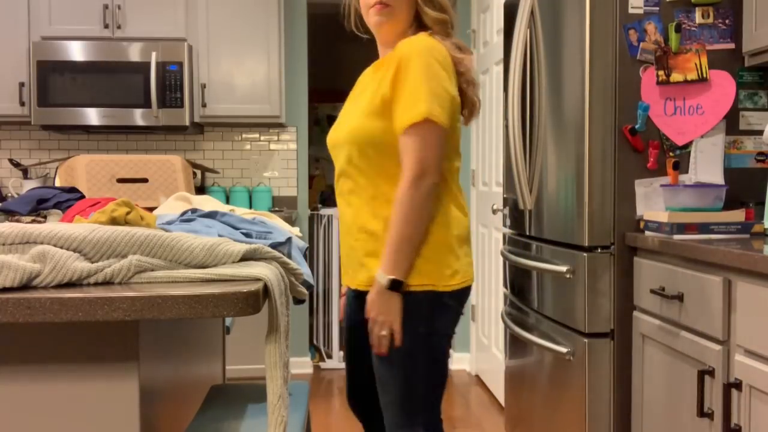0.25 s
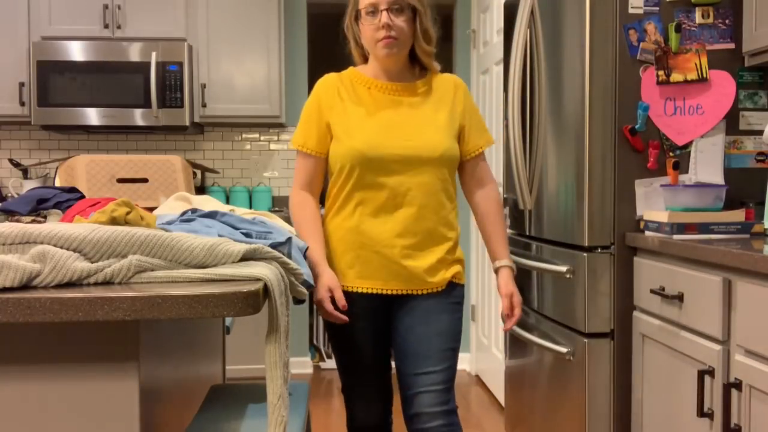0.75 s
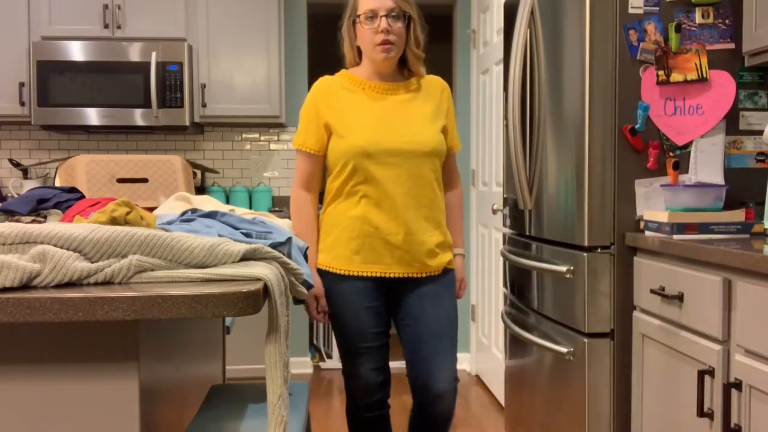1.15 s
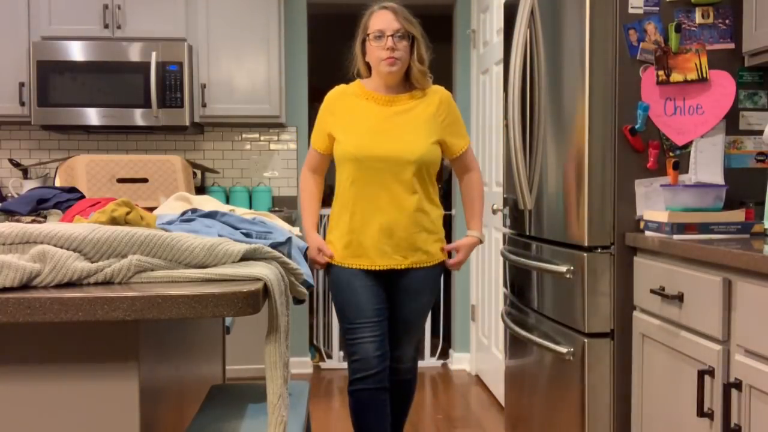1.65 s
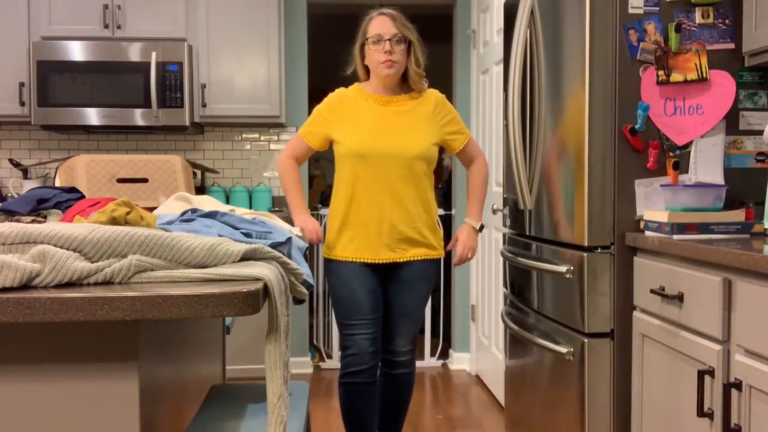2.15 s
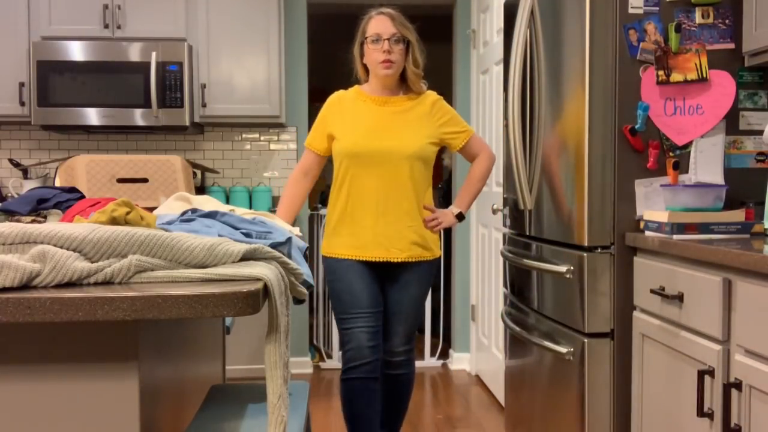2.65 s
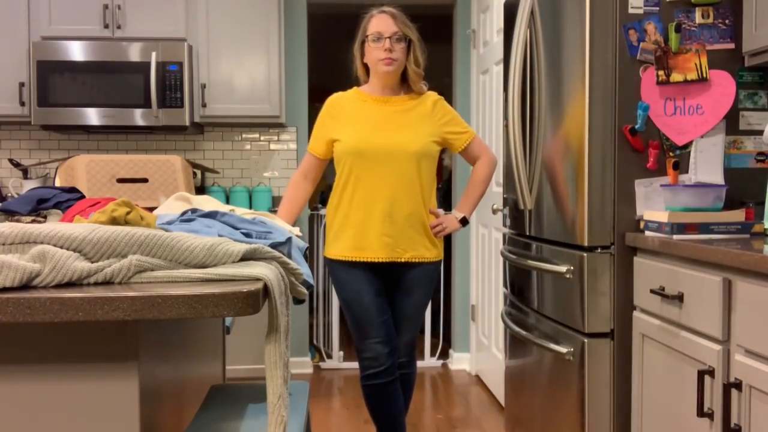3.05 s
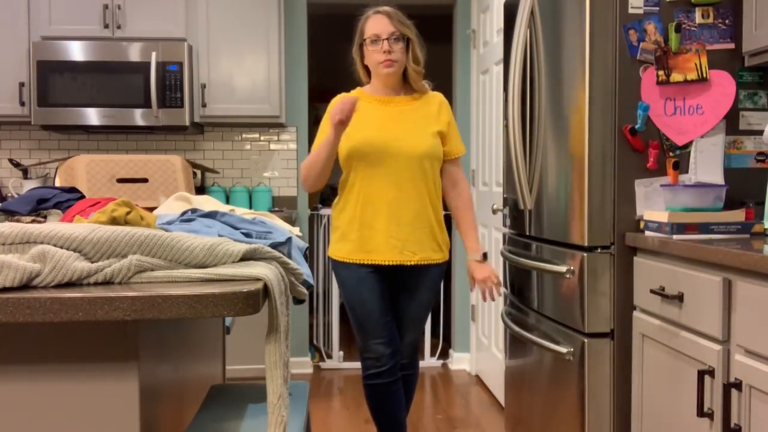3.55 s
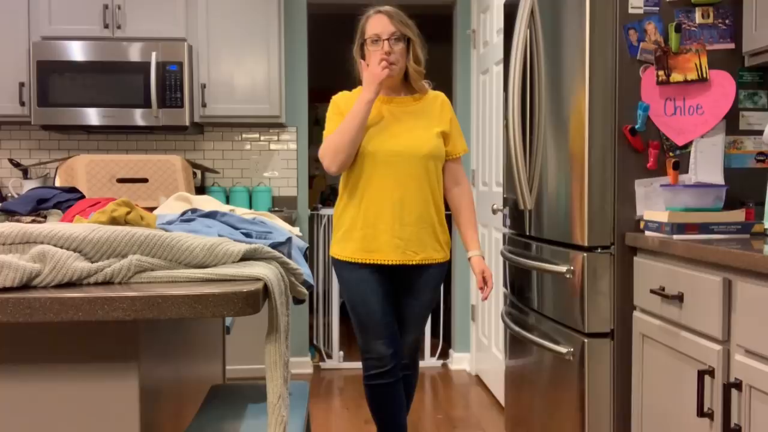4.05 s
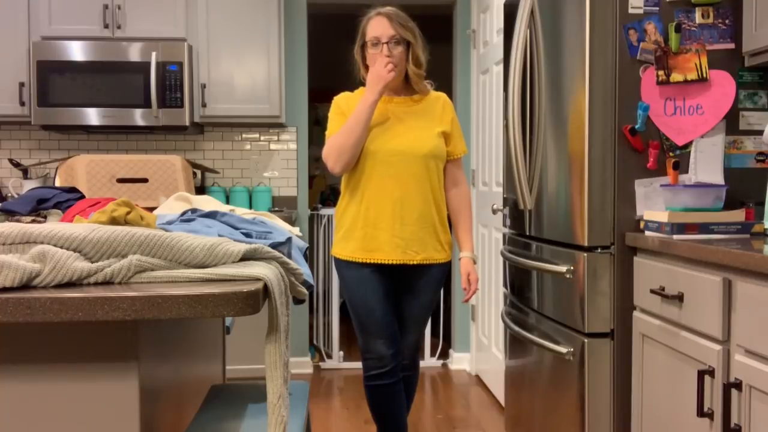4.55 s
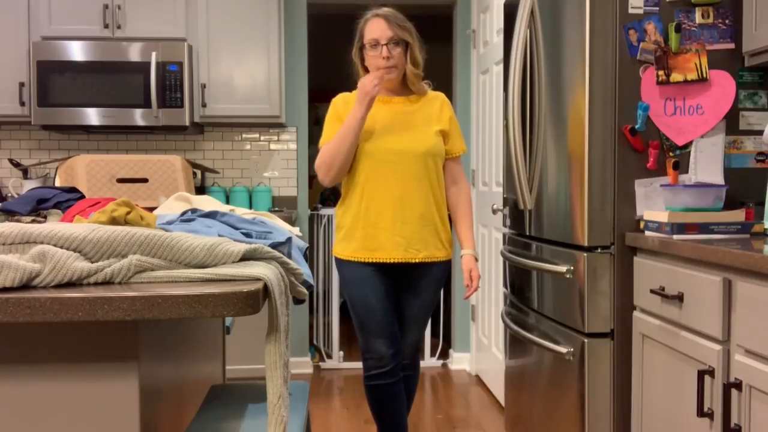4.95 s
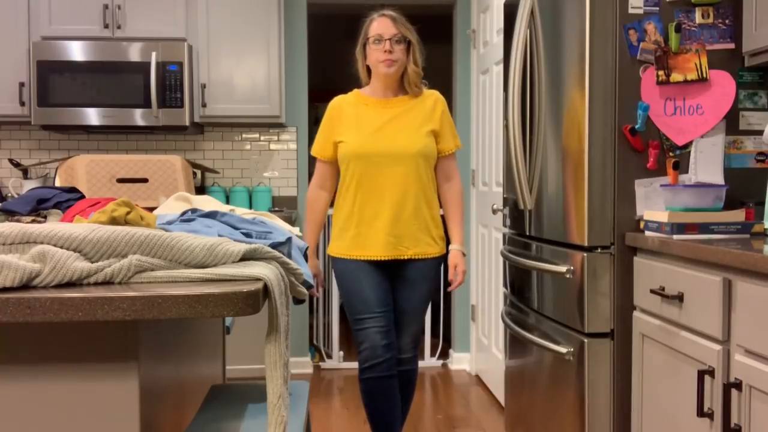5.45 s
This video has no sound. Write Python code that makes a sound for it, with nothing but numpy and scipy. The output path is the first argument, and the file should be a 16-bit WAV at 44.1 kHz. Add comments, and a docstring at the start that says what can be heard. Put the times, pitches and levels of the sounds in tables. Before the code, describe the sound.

A faint, low appliance hum fills a small kitchen with hard surfaces. Slightly to the left, gentle heel knocks and dull sole thuds land irregularly on wooden boards, each with a brief room echo, along with swishing clothes and a single quick creak. Then the person stands still, and only light ticks and a closing rustle of cloth are heard over the hum.

```python
"""An appliance hums low in a small, hard kitchen. For three seconds someone steps softly across hardwood:
heel and sole knock the boards, the room answers each contact, and jeans and sleeves swish and catch.
About a second in, one board sticks and slips in a creak. Then the walker stops and the floor calms.
Hands and clothes give a few faint ticks, and a last shift of weight rustles the cloth."""
import sys
import numpy as np
from scipy import signal
from scipy.fft import rfft, irfft, next_fast_len
from scipy.io import wavfile
from scipy.ndimage import uniform_filter1d, map_coordinates

SR = 44100
rng = np.random.default_rng(int(sys.argv[2]) if len(sys.argv) > 2 else 0)


def store_wav(level_fs):
    """Save 16-bit WAV to argv[1]."""
    pcm = np.round(np.clip(np.atleast_2d(level_fs), -1, 1) * 32767)
    wavfile.write(sys.argv[1], SR, pcm.T.astype(np.int16))


N = 250750


def amp(db):
    """Decibels to gain."""
    return 10 ** (np.asarray(db) / 20)


def unit(x):
    """Scale to rms 1."""
    return x / np.sqrt(np.mean(x ** 2) + 1e-20)


def along(points, hz):
    """Read a curve of (f/Hz, value) points on a log frequency axis."""
    f, v = np.transpose(points)
    return np.interp(np.log(hz + 1), np.log(f + 1), v)


def curves(rows):
    """One automation curve for each column after the time."""
    s, *cols = np.transpose(rows)
    return [np.interp(np.arange(N) / SR, s, c) for c in cols]


def wobble(rate):
    """A smooth random curve, rate knots a second."""
    return map_coordinates(rng.standard_normal(int(N * rate / SR) + 4), [np.arange(N) * rate / SR])


def ripple(hz, width_hz):
    """A smooth random EQ curve: near surfaces colour each sound in their own way."""
    return map_coordinates(rng.standard_normal(int(SR / width_hz) + 4), [hz / width_hz])


def filtered(x, response):
    """Pass x through a frequency response."""
    n = x.shape[-1]
    m = next_fast_len(n + SR // 4)
    return irfft(rfft(x, m) * response(np.fft.rfftfreq(m, 1 / SR)), m)[..., :n]


def causal(gain):
    """The minimum-phase response with this gain: it rings only after the blow."""
    cepstrum = irfft(np.log(np.maximum(gain, 1e-6)))
    half = len(cepstrum) // 2
    cepstrum[1:half] *= 2
    cepstrum[half + 1:] = 0
    return np.exp(rfft(cepstrum))


def resonances(modes, hz):
    """Summed power gain of (f/Hz, width/Hz, level/dB) resonances."""
    return sum(np.abs(amp(db) * hz * w / (f * f - hz * hz + 1j * hz * w)) ** 2 for f, w, db in modes)


def add(track, s, sound):
    """Mix a sound in at time s."""
    part = track[:, max(round(s * SR), 0):][:, :sound.shape[1]]
    part += sound[:, :part.shape[1]]


def diffuse(size):
    """Stereo white noise, centred in the bass and wide in the treble."""
    # likeness of left and right: f/Hz, correlation
    alike = [(100, 0.98), (170, 0.99), (290, 0.91), (640, 0.74), (1400, 0.25), (3000, 0.098), (8000, 0.071)]

    def width(hz):
        angle = np.arccos(np.clip(along(alike, hz), -1, 1)) / 2
        return np.array([np.cos(angle), np.sin(angle)])
    mid, side = filtered(rng.standard_normal((2, size)), width)
    return np.array([mid + side, mid - side])


def rush(spectrum):
    """Diffuse noise of rms 1 with the given spectral shape."""
    return unit(filtered(diffuse(N), lambda hz: amp(along(spectrum, hz))))


def kitchen(direct_db, build_s=0.0016, early_db=4, early_s=0.058, soft_hz=5000, lag_s=.00006):
    """A fresh room response: direct sound, strong early echoes off the cabinets, then the tail."""
    # reverb time: f/Hz, t60/s
    decay = [(100, 0.39), (260, 0.41), (700, 0.38), (1840, 0.41), (4850, 0.21), (14000, 0.11)]
    size = SR // 2
    t = np.arange(size) / SR
    hz, s, spectra = signal.stft(diffuse(size), SR, nperseg=256)
    tail = signal.istft(spectra * amp(-60 * s / along(decay, hz)[:, None]), SR, nperseg=256)[1][:, :size]
    tail = tail * (1 - np.exp(-t / build_s)) * amp(early_db * np.exp(-t / early_s))
    # treble above soft_hz arrives mostly off the walls; the rest reaches left just before right
    lag = lambda hz: np.exp(-2j * np.pi * np.outer([0, lag_s], hz))
    direct = filtered(1. * (t == 0), lambda hz: lag(hz) * causal(1 / np.sqrt(1 + (hz / soft_hz) ** 6)))
    return tail / np.linalg.norm(tail[0]) + amp(direct_db) * direct


def room_tone(air_db=-66, hum_db=-1, drift_rad=0.53):
    """The bed: still air and a slightly unsteady appliance hum."""
    # air spectrum: f/Hz, relative level/dB
    air = [(12, -19.5), (20, -2), (153, -4), (207, -15.5), (416, -20), (834, -25), (958, -28),
           (1160, -29.5), (2270, -36.5), (4430, -37.5), (6720, -41), (9130, -39.5), (15500, -44.5)]
    # appliance tones: f/Hz, level/dB relative to hum_db
    tones = [(86.1, -70.5), (156.1, -66.5), (269.2, -75.5)]
    t = np.arange(N) / SR
    hum = np.zeros(N)
    for hz, db in tones:
        peak = np.sqrt(2) * amp(db + hum_db + 1.6 * wobble(4.8))
        hum += peak * np.sin(2 * np.pi * hz * t + drift_rad * wobble(17))
    return amp(air_db) * rush(air) + hum


def rumble(level_db=-3, walking_db=-59, standing_db=-64.5, stop_s=3.5, calm_s=0.23):
    """The floor stirs under each shift of weight and calms once the walker stands."""
    # shifts from leg to leg: t/s, relative level/dB, half length/s
    shifts = [(.1, -54.5, 0.82), (.95, -50.5, 0.08), (1.58, -45, .08), (2.48, -53.5, 0.12),
              (2.97, -46.5, 0.048), (5.41, -58, 0.074), (5.69, -57, 0.077)]
    # floor rumble spectrum: f/Hz, relative level/dB
    spectrum = [(20, -0.5), (45, -0.5), (90, 1), (160, -3), (220, -3), (400, -19), (700, -27), (2000, -43)]
    t = np.arange(N) / SR
    standing = (1 + np.tanh((t - stop_s) / calm_s)) / 2
    power = amp(walking_db + (standing_db - walking_db) * standing) ** 2
    power += sum(amp(db) ** 2 * np.exp(-((t - s) / half_s) ** 2) for s, db, half_s in shifts)
    return amp(level_db) * np.sqrt(power) * rush(spectrum)


def squeaks(level_db=0, width_hz=500):
    """Soles and seams catch for a moment and give thin, narrow zips."""
    # zips: t/s, level/dB, pitch/Hz, decay/s
    zips = [(.866, -58.5, 7560, 0.015), (1.275, -57, 9350, 0.018), (1.316, -53.5, 9560, 0.013),
            (2.346, -64.5, 9200, 0.01), (2.441, -64.5, 7400, 0.026), (2.811, -66.5, 10900, 0.0092)]
    out = np.zeros((2, N))
    t = np.arange(SR // 4) / SR
    for s, db, pitch_hz, decay_s in zips:
        band = filtered(diffuse(len(t)), lambda hz: np.sqrt(resonances([(pitch_hz, width_hz, 0)], hz)))
        envelope = (1 - np.exp(-t / 0.0039)) * np.exp(-t / decay_s)
        add(out, s, amp(db + level_db) * unit(band) * envelope)
    return out


def stroke(s, rise_s, fall_s, drop_db=20, shape=1.246):
    """Envelope of one rub, speeding up until time s, then slowing; shape 1 is pointed, 2 rounded."""
    t = np.arange(N) / SR - s
    distance = np.abs(np.where(t < 0, t / rise_s, t / fall_s))
    return amp(-drop_db * distance ** shape)


def fibres(patch_db=1.5):
    """Hiss of rms 1 whose brighter patches wander as the fabric moves."""
    # fibre hiss spectrum: f/Hz, relative level/dB
    hiss = [(800, -11.5), (2000, -0.5), (3300, 0.5), (7000, -2.5), (9400, -3), (15500, -8.5)]
    spectra = signal.stft(rush(hiss), nperseg=512)[2]
    patches = uniform_filter1d(rng.standard_normal(spectra.shape[1:]), size=3, axis=0)
    patches = uniform_filter1d(patches, size=16, axis=1)
    return unit(signal.istft(spectra * amp(patch_db * unit(patches)), nperseg=512)[1][:, :N])


def cloth(swish_db=3, folds_db=0, grain_db=1, ripple_db=2.5, ripple_hz=90):
    """Fabric slides on fabric: catching fibres hiss over duller folds, coloured by near surfaces."""
    # rubs: fastest t/s, relative swish level/dB, relative fold level/dB, rise/s, fall/s
    rubs = [(.01, -72.5, -69, 0.13, 0.28), (.31, -70.5, -82, 0.36, 0.22), (.57, -62.5, -70.5, 0.19, .2),
            (1.0, -61.5, -54.5, 0.08, 0.097), (1.294, -65, -67, 0.044, 0.15),
            (1.479, -60.5, -53, 0.14, 0.21), (1.55, -62.5, -73, 0.041, 0.098),
            (1.949, -71.5, -64, 0.12, 0.17), (2.521, -63.5, -57.5, 0.096, 0.22),
            (2.944, -55.5, -50, 0.039, .11), (3.11, -75, -72.5, .12, 0.1116),
            (3.445, -64.5, -75.5, 0.17, 0.11), (3.721, -82.5, -88.5, .15, .12), (4.905, -81, -93, .07, .05),
            (5.42, -59, -58, 0.088, 0.071), (5.668, -52.5, -51.5, 0.11, 0.14)]
    # spectrum of the folds: f/Hz, relative level/dB
    folds = [(100, -10.5), (250, 6), (420, 6), (600, 2.5), (1050, 1), (1600, -1), (2200, -6), (4000, -5.5),
             (9000, -54)]
    # rings in the rustle: f/Hz, width/Hz, level/dB
    rings = [(438, 31, 7), (950, 100, 2), (3720, 260, -1), (5400, 900, 1)]
    power = sum(np.outer(amp([hiss_db, fold_db]), stroke(s, rise_s, fall_s)) ** 2
                for s, hiss_db, fold_db, rise_s, fall_s in rubs)
    swish, body = np.sqrt(power)
    catching = amp(grain_db * wobble(250))
    rub = catching * (amp(swish_db) * swish * fibres() + amp(folds_db) * body * rush(folds))
    surfaces = lambda hz: amp(ripple_db * ripple(hz, ripple_hz) * np.minimum(hz / 1500, 1))
    return filtered(rub, lambda hz: causal(surfaces(hz) * np.sqrt(1 + resonances(rings, hz))))


def taps(level_db=23, contact_s=0.001004):
    """Hands and clothes touch lightly: each tick is a brush of a few milliseconds that does not ring."""
    # touches: t/s, relative level/dB, then EQ offsets: body/dB, snap/dB, fizz/dB
    touches = [(2.128, -71, -5, -0.5, -11), (2.494, -46.5, -8, -5.5, -13.5), (2.76, -65.5, 7, -12, -16),
               (4.243, -51.5, -3.5, -12, -36.5), (4.838, -65, -3.5, -0.5, -22.5),
               (5.291, -75.5, -2, -13, -21), (5.337, -58.5, -4, 0.5, -22)]
    out = np.zeros((2, N))
    age = np.arange(SR // 40) / SR / contact_s
    for s, db, body_db, snap_db, fizz_db in touches:
        brush = rng.standard_normal((2, len(age))) * age * np.exp(-age)
        in_room = signal.fftconvolve(kitchen(direct_db=1.5), brush / np.linalg.norm(brush[0]), axes=1)
        eq = [(80, body_db - 8), (380, body_db + 12.5), (1050, 11.5), (3000, snap_db + 14),
              (5500, fizz_db + 18.5), (15000, fizz_db + 7)]
        tick = filtered(in_room, lambda hz: causal(amp(along(eq, hz))))
        add(out, s - contact_s, amp(db + level_db) * tick)
    return out


def bending(hz, spread_s):
    """Bending waves carry the highs first: travel time goes as 1 / sqrt(f) and is spread_s at 1 kHz."""
    return np.exp(-4j * np.pi * spread_s * np.sqrt(hz * 1000))


def creak(level_db=-2, jitter=.2, scatter_db=3, edge_width_hz=230, spread_s=0.001976):
    """A board sticks and slips unevenly; the ring of its pinched edge slides as the weight rolls over."""
    # course of the creak: t/s, relative level/dB, slip rate/Hz, edge ring/Hz
    course = [(.937, -49, 295, 2460), (.945, -43, 345, 2600), (.957, -44.5, 386, 1830),
              (.975, -45.5, 377, 1106), (.993, -44, 452, 980), (1.001, -35, 504, 940),
              (1.012, -43, 540, 1250), (1.034, -46, 530, 1880), (1.044, -61, 250, 1706)]
    # the board's own rings: f/Hz, width/Hz, relative level/dB
    rings = [(479.5, 44, 2), (880, 92, 2), (1141, 89, -2.5), (1500, 51, 1.5), (1650, 55, -1),
             (1970, 48, 1.5), (2700, 230, -6), (3230, 230, -8), (3950, 200, -10)]
    db, rate, pitch = curves(course)
    t = np.arange(N) / SR
    slip_count = np.floor(np.cumsum(rate * np.exp(jitter * wobble(300))) / SR)
    slips = (np.diff(slip_count, prepend=0) > 0) * (t > course[0][0]) * (t < course[-1][0])
    force = slips * np.sqrt(SR / rate) * amp(db + level_db + scatter_db * rng.standard_normal(N))
    # one resonance carried along the sliding pitch
    spin = np.exp(2j * np.pi * np.cumsum(pitch) / SR)
    pole = np.exp(-np.pi * edge_width_hz / SR)
    edge = (spin * signal.lfilter([np.sqrt(2 * (1 - pole ** 2))], [1, -pole], force / spin)).imag
    wood = lambda hz: unit(np.sqrt(resonances(rings, hz) / (1 + (hz / 4300) ** 12)))
    board = filtered(force, lambda hz: bending(hz, spread_s) * causal(wood(hz)))
    return signal.fftconvolve((edge + board)[None], kitchen(direct_db=2.5), axes=1)[:, :N] / 2


def knock(db, thud_db, board_db, crack_db, scuff_db, direct_db, spot_ring, spread_s=.0022, ripple_db=4.5):
    """A contact bends the boards: a quick falling chirp, then the rings of floor and room."""
    # floor resonances: f/Hz, width/Hz, level/dB
    floor = [(38.8, 15, 10.5), (121.3, 20, 3), (149.5, 45, 1.5), (175.5, 37, -2), (288, 18, -1.5),
             (380, 90, 6), (437, 24, 9.5), (523, 44, 10), (640, 20, 5.5), (884, 49, 3), (1130, 67, 1),
             (1680, 23, -2.5), (3190, 200, 3.5)]
    modes = list(floor) + [spot_ring]  # each spot of the floor favours one ring
    eq = [(25, thud_db + 10), (70, thud_db + 6), (150, thud_db + 21.5), (380, board_db + 9.5),
          (1050, 4.65), (3000, crack_db + 3.5), (4600, scuff_db + 3), (7000, scuff_db),
          (15000, scuff_db - 11.5)]
    colour = lambda hz: amp(along(eq, hz) + ripple_db * ripple(hz, 220) * np.minimum(hz / 1500, 1))
    boards = lambda hz: causal(colour(hz) * np.sqrt(1 + resonances(modes, hz))) * bending(hz, spread_s)
    return amp(db) * filtered(kitchen(direct_db), boards)


def footsteps(level_db=23, lead_s=.0011, settle_s=0.041, settle_db=-10.5):
    """Each footfall is a bright heel knock, then a duller sole slap, and a softer repeat of that slap as the
    weight settles."""
    # footfalls, levels relative: t/s, heel/dB, crack/dB, scuff/dB, heel direct sound/dB, heel ring/Hz,
    # roll onto the sole/s, sole thud/dB, sole board/dB, sole ring/Hz
    footfalls = [(0.15, -58, -14, -32, -6.5, 434, 0.0063, -54, -51, 434),
                 (.199, -52.5, -7, -6.5, -4, 1410, 0.021, -67, -66, 500),
                 (.762, -43, -21, -23, -6, 410, .01, -45.5, -46.5, 398),
                 (.866, -51, -19, -15, 0, 400, 0.019, -43, -44, 380),
                 (1.3893, -30, -4, -8, 2, 2980, .019, -39, -40.5, 420),
                 (1.477, -35.5, -14, -15.5, 6.5, 930, 0.013, -43.5, -40, 477),
                 (1.526, -31.5, -16, -13, -5.5, 950, 0.013, -30.5, -44.5, 170.5),
                 (1.878, -34.5, -16.5, -23, -9, 970, 0.016, -54.5, -46, 445),
                 (1.908, -32, -8, -16.5, 5.5, 437, .011, -34, -26, 275),
                 (2.347, -60.5, -3, -10, -6, 400, 0.014, -62, -58, 400),
                 (2.665, -40.5, -12.5, -20.5, -4, 1460, .017, -41.5, -46.5, 388),
                 (2.915, -31, -9.5, -7, -1.5, 1134, .014, -36.5, -39, 392)]
    heel_thud_db, heel_board_db = -9, -7.5  # a heel is light in the bass
    soft_db, dull_db = -10, -8  # a sole has less knock and less treble
    heel_q, heel_ring_db, sole_q, sole_ring_db = 9, 5.5, 7.5, 9.5
    out = np.zeros((2, N))
    for s, heel_db, crack_db, scuff_db, direct_db, heel_hz, roll_s, thud_db, board_db, sole_hz in footfalls:
        heel_ring = (heel_hz, heel_hz / heel_q, heel_ring_db)
        heel = knock(heel_db, heel_thud_db, heel_board_db, crack_db, scuff_db, direct_db, heel_ring)
        add(out, s - lead_s, heel)
        sole_ring = (sole_hz, sole_hz / sole_q, sole_ring_db)
        sole_db = board_db + soft_db
        sole_eq = (thud_db - sole_db, -soft_db, crack_db + dull_db, scuff_db + dull_db)
        for delay_s, db in [(0, sole_db), (settle_s, sole_db + settle_db)]:
            add(out, s + roll_s + delay_s, knock(db, *sole_eq, direct_db=0, spot_ring=sole_ring))
    return amp(level_db) * out


def scene():
    """The walker sits a little left in the stereo image, over the room tone."""
    # pan by frequency: f/Hz, left minus right/dB
    pan = [(150, -0.5), (500, 0.8), (1200, 2.1), (2800, 3.5), (5500, 3), (9000, -0.5), (14000, -0.5)]
    walker = footsteps() + creak() + taps() + cloth() + squeaks() + rumble()
    return filtered(walker, lambda hz: amp(np.outer([.5, -.5], along(pan, hz)))) + room_tone()


def record(dry):
    """A brick-wall low-pass takes off the very top."""
    top_hz = 15800
    return filtered(dry, lambda hz: hz < top_hz)


dry = scene()
out = record(dry)
store_wav(out)
```